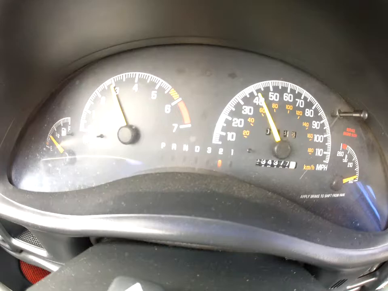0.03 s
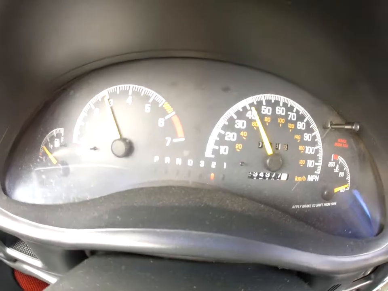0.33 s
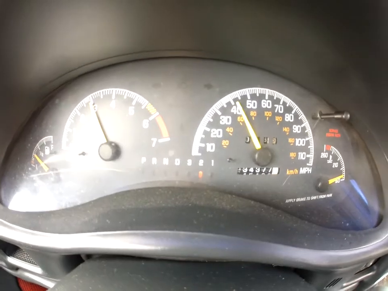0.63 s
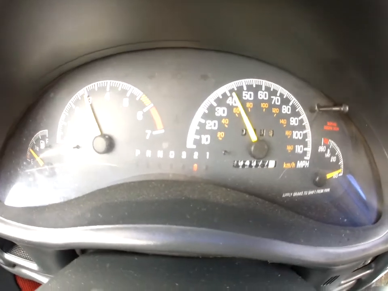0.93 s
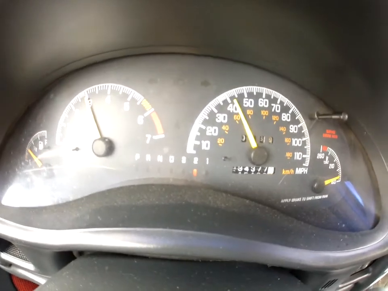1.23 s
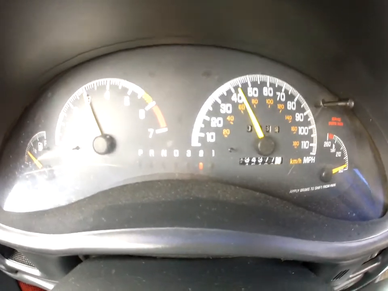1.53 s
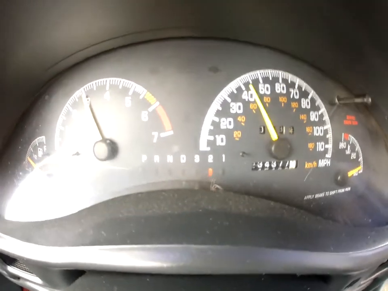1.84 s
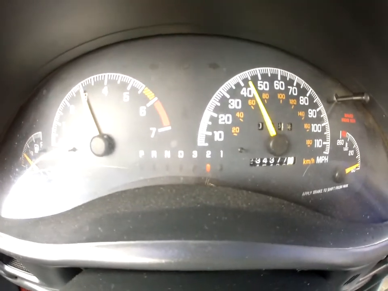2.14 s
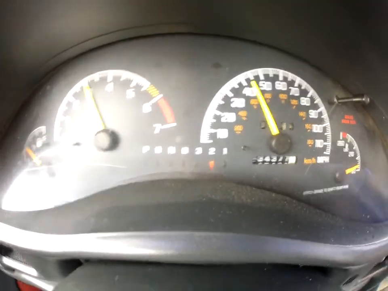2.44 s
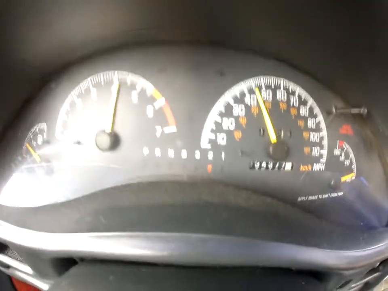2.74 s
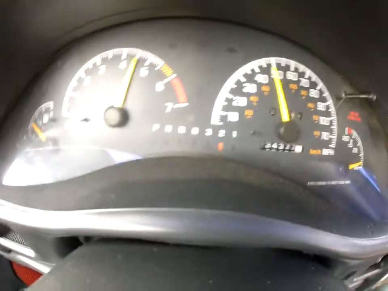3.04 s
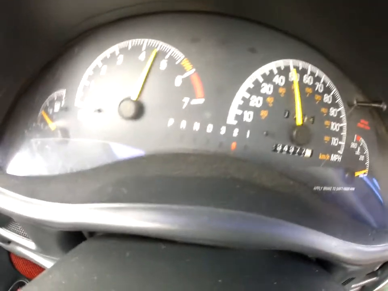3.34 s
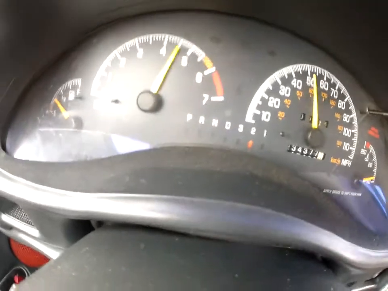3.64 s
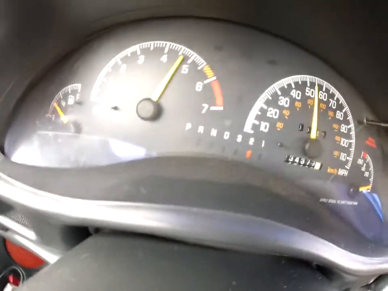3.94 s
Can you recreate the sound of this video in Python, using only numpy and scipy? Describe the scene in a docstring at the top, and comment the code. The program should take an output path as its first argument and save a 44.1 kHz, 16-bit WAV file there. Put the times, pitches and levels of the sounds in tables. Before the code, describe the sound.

A car engine hums low under steady road rumble, heard inside the cabin, with a soft bump around 1.1 seconds. At 2.5 seconds the accelerator clacks twice, air gulps in and the revs double by 2.8 seconds. The engine then holds a loud, throbbing roar with a faint supercharger whine and a thin microphone fizz, its pitch rising slightly just before the end at 4 seconds.

```python
"""Inside a cruising car, the road rumbles under the low hum of a V6 engine.
The accelerator is stamped down with two clacks, the gearbox drops to a lower gear and the revs double.
Air rushes in, a supercharger whines faintly, and the firing cylinders make the exhaust roar.
A small camera overloads slightly and holds each sample, which mirrors the sound into a thin, high fizz."""
import sys
import numpy as np
from scipy import signal
from scipy.fft import rfft, irfft, next_fast_len
from scipy.io import wavfile
from scipy.ndimage import map_coordinates

SR = 44100
rng = np.random.default_rng(int(sys.argv[2]) if len(sys.argv) > 2 else 0)


def log_audio(samples):
    """Write samples as a 16-bit WAV file to the path given in sys.argv[1]."""
    # one column per channel
    frames = np.atleast_2d(samples).T
    # limit to full scale, then quantise
    limited = np.clip(frames, -1, 1)
    pcm = np.round(limited * 32767).astype(np.int16)
    wavfile.write(sys.argv[1], SR, pcm)


N = 176400
CYLINDERS, LOBES_PER_CYCLE = 6, 11.39  # in one engine cycle, every cylinder fires once

# Levels are in decibels; engine load and throttle further scale the roar and the surge.
# tyre rumble and hiss (frequency [Hz], level [dB])
ROAD_SPECTRUM = [(10, -41), (25, -14), (50, -2.5), (75, -1), (95, 2), (115, -6.5), (165, -6.5),
                 (220, -11.5), (275, -7), (320, -16), (430, -18), (530, -22), (640, -21), (760, -35),
                 (1250, -35), (2500, -46.5), (3800, -56.5), (5400, -61.5), (5900, -73)]
# swells of low rumble: road bumps, and one as the engine booms (time [s], length [s], bass boost [dB])
RUMBLE_SWELLS = [(1.146, 0.13, 6.5), (2.766, 0.051, 4), (2.99, 0.3, 9.5), (3.602, .1, 8.5)]
# how fast the engine runs (time [s], speed [cycles/s])
ENGINE_SPEED = [(.1, 17.05), (1.2, 17.35), (2.47, 17.6), (2.59, 27), (2.64, 29.4), (2.695, 33.3), (2.8, 36),
                (3, 36.15), (3.1, 35.8), (3.22, 34.95), (3.36, 36.1), (3.45, 36.35), (3.78, 35.95),
                (3.93, 37.5), (4, 37.8)]
# how hard the engine works (time [s], level [dB])
ENGINE_LOAD = [(2.4, -38.5), (2.52, -10), (2.62, -7.5), (2.72, -1.5), (2.79, -0.5), (3.15, -1.5), (3.3, 0),
               (3.75, -1), (4, 0.5)]
# cruising hum (multiple of engine speed, level [dB])
HUM_TONES = [(4, -28.5), (8, -24.5), (15, -34.5), (24, -40), (28, -42.5), (36, -45)]
# cabin drone at twice the firing rate (time [s], level [dB])
DRONE_LEVEL = [(.1, -18), (.45, -23.5), (.9, -26), (1.3, -32), (2.4, -36.5), (2.6, -40)]
# pedal scuffs and clacks (time [s], level [dB], rise [s], time to fade 60 dB [s], clatter level [dB])
PEDAL_CLACKS = [(2.482, -40, 0.0033, 0.1, -9.5), (2.496, -24.5, 0.0067, 0.053, -7),
                (2.576, -32.5, 0.004, 0.064, 0.5)]
# the body of a clack (frequency [Hz], level [dB])
CLACK_COLOUR = [(300, -1.5), (1200, 7), (1800, 7), (2200, -0.5), (2600, 6), (3600, -8), (4400, 5.5),
                (5200, -2), (5900, 0)]
# its high clatter (frequency [Hz], level [dB])
CLATTER_COLOUR = [(2500, -8), (3700, -2.5), (4500, 1.5), (5500, -11.5)]
# pedal squeak and thuds (time [s], pitch [Hz], level [dB], time to fade 60 dB [s])
PEDAL_TONES = [(2.493, 5450, -32, 0.03), (2.509, 410, -6.5, 0.055), (2.509, 282, -10.5, 0.07),
               (2.582, 185, -12, .04)]
# supercharger tones (multiple of the rate at which its rotor lobes pass)
WHINE_TONES = [4, 6, 7, 8, 9]
# those tones swell in turn (time [s], then one level [dB] for each tone)
WHINE_LEVELS = [(2.63, -62, -62, -56, -50, -66), (2.705, -40, -56, -58, -38, -64),
                (2.79, -39, -58, -52, -49, -53), (2.88, -52, -55, -51, -50, -55),
                (3.05, -39, -53, -51, -48.5, -50), (3.22, -39, -56, -54, -52, -61),
                (3.35, -46.5, -47, -52, -52, -60), (3.52, -41.5, -57, -43, -50, -63),
                (3.72, -46.5, -48.5, -49.5, -49, -62), (3.87, -39, -46, -57, -50.5, -63),
                (4, -43, -39, -60, -55, -60)]
# air whistling at the throttle (time [s], length [s], level [dB])
THROTTLE_WHISTLES = [(2.636, .045, -35), (3.21, 0.15, -50)]
# gulp of air as the throttle opens (time [s], level [dB])
GULP_LEVEL = [(2.5, -59), (2.6, -28.5), (2.68, -25), (2.76, -24), (2.86, -55)]
# the gulp's tone colour (frequency [Hz], level [dB])
GULP_COLOUR = [(300, -30), (560, 7.5), (690, 4), (900, -9), (3000, -27.5), (5800, -51)]
# intake howl as the revs climb again (time [s], level [dB])
HOWL_LEVEL = [(3.7, -58.5), (3.88, -35), (4, -34)]
# the howl's tone colour (frequency [Hz], level [dB])
HOWL_COLOUR = [(500, -18.5), (700, 2.5), (1000, -11), (1320, 1), (1600, -34.5), (5000, -50)]
# air drawn into the engine (frequency [Hz], level [dB])
INTAKE_SPECTRUM = [(25, 2), (70, 8.5), (170, 0), (400, -2.5), (680, -7), (950, -21.5), (1550, -21),
                   (1900, -25), (3300, -29), (4500, -30.5), (5350, -33.5), (5750, -43.5)]
# rasp of the firing pulses (frequency [Hz], level [dB])
RASP_SPECTRUM = [(150, -27.5), (400, -2), (600, -1), (850, -11), (1100, -8), (1500, -14), (2000, -36.5),
                 (5000, -63.5)]
# boom of the firing tone (time [s], level [dB])
FIRING_LEVEL = [(2.48, -42), (2.58, -20), (2.68, -15.5), (2.76, -34.5), (2.85, -16), (3.1, -22),
                (3.24, -30.5), (3.45, -20.5), (4, -25)]
# exhaust roar (multiple of engine speed, level [dB])
EXHAUST_TONES = [(2, -27.5), (4, -21.5), (7, -36), (8, -23.5), (9, -23), (10, -21.5), (12, -22.5),
                 (13, -27), (14, -21.5), (18, -33), (19, -32.5), (20, -38), (22, -43.5), (23, -37),
                 (24, -39.5), (26, -45)]
# pitches the cabin boosts or weakens (frequency [Hz], gain [dB])
CABIN_RESONANCES = [(322, -0.5), (341, 5), (360, 0.5), (377, -6.5), (425, -7.5), (485, 0.5), (509, 1),
                    (530, -14), (570, -0.5)]


def amp(db):
    """Turn decibels into a gain."""
    return 10 ** (np.asarray(db) / 20)


def unit(x):
    """Scale to an average (rms) size of 1."""
    return x / np.sqrt(np.mean(x ** 2) + 1e-20)


def curve(rows):
    """Join (time, value) points with straight lines."""
    return np.interp(np.arange(N) / SR, *np.transpose(rows))


def swell(time, length):
    """A bell-shaped rise and fall around a moment."""
    return np.exp(-(2 * (np.arange(N) / SR - time) / length) ** 2)


def wobble(rate):
    """A smooth curve through `rate` random values a second."""
    return map_coordinates(rng.standard_normal(1200), [np.arange(N) * rate / SR + 2], mode="wrap")


def colour(x, spectrum):
    """Filter a sound to follow a spectrum, then scale it to size 1."""
    size = 2 * next_fast_len(N // 2 + 8192)
    hz, db = np.transpose(spectrum)
    log_hz = np.log(np.fft.rfftfreq(size, 1 / SR) + 1)
    cepstrum = irfft(np.log(amp(np.interp(log_hz, np.log(hz), db))))
    # make the filter ring after a pulse, never before it
    cepstrum[1:size // 2] *= 2
    cepstrum[size // 2 + 1:] = 0
    return unit(irfft(rfft(x, size) * np.exp(rfft(cepstrum)))[:N])


def noise(spectrum):
    """Noise with the given spectrum."""
    return colour(rng.standard_normal(N), spectrum)


def tones(cycles, rows, waver_db, drift, rate):
    """Tones at whole multiples of a cycle, each wavering in level and drifting in phase."""
    out = np.zeros(N)
    for multiple, db in rows:
        phase = 2 * np.pi * (multiple * cycles + rng.random()) + drift * wobble(rate)
        out += np.sqrt(2) * amp(db + waver_db * wobble(rate)) * np.sin(phase)
    return out


def road(bass_hz=150):
    """Tyres rumble and hiss; the bass swells over bumps and once as the engine booms."""
    rumble = amp(-20.5 + .5 * wobble(12)) * noise(ROAD_SPECTRUM)
    bass = signal.sosfiltfilt(signal.butter(2, bass_hz, fs=SR, output="sos"), rumble)
    heave_db = 0.88 * wobble(14) + sum(db * swell(time, length) for time, length, db in RUMBLE_SWELLS)
    return rumble + bass * (amp(heave_db) - 1)


def cruise(cycles, load):
    """The cabin drones, and a gentle hum gives way as the engine works harder."""
    hum = tones(cycles, HUM_TONES, waver_db=0.5, drift=0.5, rate=9) * np.clip(1 - 2 * load, 0, 1)
    drone = tones(cycles, [(2 * CYLINDERS, 0)], waver_db=1, drift=0.077, rate=20)
    return hum + amp(curve(DRONE_LEVEL)) * drone


def pedal():
    """The accelerator squeaks, clacks and thuds against its stop."""
    t, out = np.arange(N) / SR, np.zeros(N)
    for time, db, rise, fade, clatter_db in PEDAL_CLACKS:
        attack = np.clip((t - time) / rise, 0, 1)
        decay = amp(db - 60 * np.maximum(t - time - 2 * rise, 0) / fade)
        out += attack * decay * (noise(CLACK_COLOUR) + amp(clatter_db) * noise(CLATTER_COLOUR))
    for time, hz, db, fade in PEDAL_TONES:
        age = np.maximum(t - time, 0)
        attack = 1 - np.exp(-age / 0.0011)
        out += attack * amp(db - 60 * age / fade) * np.sin(2 * np.pi * hz * age)
    return out


def supercharger(cycles):
    """The air pump's spinning lobes whine in step with the engine."""
    times, *levels = np.transpose(WHINE_LEVELS)
    whine = np.zeros(N)
    for multiple, db in zip(WHINE_TONES, levels):
        tone = tones(LOBES_PER_CYCLE * cycles, [(multiple, 0)], waver_db=2, drift=0.28, rate=22)
        whine += amp(curve(np.c_[times, db])) * tone
    return whine


def whistle(hz=1980):
    """Air whistles briefly past the throttle."""
    tone = tones(hz * np.arange(N) / SR, [(1, 0)], waver_db=3.5, drift=0.5, rate=110)
    return tone * sum(amp(db) * swell(time, length) for time, length, db in THROTTLE_WHISTLES)


def gulp_and_howl():
    """Air gulps through the opening throttle and later howls in the intake."""
    return amp(curve(GULP_LEVEL)) * noise(GULP_COLOUR) + amp(curve(HOWL_LEVEL)) * noise(HOWL_COLOUR)


def intake(cycles):
    """Air rushes in, pulsing with each row of cylinders and each turn of the crankshaft."""
    row_pulse = 0.083 * np.sin(np.pi * CYLINDERS * cycles)
    crank_pulse = 0.044 * np.sin(2 * np.pi * 2 * cycles)
    level = amp(-19 + .6 * wobble(7))
    return level * colour((1 + row_pulse + crank_pulse) * rng.standard_normal(N), INTAKE_SPECTRUM)


def rasp(cycles, uneven=0.5, scatter=0.086):
    """One pulse per firing; each cylinder has its own strength and slightly different timing."""
    strength = 1 + uneven * unit(rng.standard_normal(CYLINDERS))
    lag = 0.074 * rng.standard_normal(CYLINDERS)
    firings = np.arange(1, int(cycles[-1] * CYLINDERS) - 1)
    cylinder = firings % CYLINDERS
    samples = np.interp((firings + lag[cylinder]) / CYLINDERS, cycles, np.arange(N))
    sizes = strength[cylinder] * (1 + scatter * rng.standard_normal(len(firings)))
    return amp(-35) * colour(np.bincount(samples.astype(int), sizes, N), RASP_SPECTRUM)


def firing_tone(cycles):
    """The firings blend into one note that booms as it sweeps through the cabin's resonance."""
    return amp(curve(FIRING_LEVEL)) * tones(cycles, [(CYLINDERS, 0)], waver_db=0.5, drift=0.091, rate=10)


def exhaust(cycles, speed, throb_hz=10.1, throb_peak_s=2.755):
    """Exhaust tones swell and fade as they slide through the cabin's resonances, over a low boom."""
    hz, gain_db = np.transpose(CABIN_RESONANCES)
    growl = np.zeros(N)
    for multiple, db in EXHAUST_TONES:
        cabin_gain = amp(np.interp(multiple * speed, hz, gain_db))
        growl += cabin_gain * tones(cycles, [(multiple, db)], waver_db=1.1, drift=.1, rate=24)
    # one row of cylinders booms, throbbing about once per wheel turn
    boom = tones(cycles, [(CYLINDERS // 2, -12)], waver_db=1, drift=0.09, rate=20)
    throb_db = 1.7 * np.cos(2 * np.pi * throb_hz * (np.arange(N) / SR - throb_peak_s))
    return growl + amp(throb_db) * boom


def scene():
    """Engine speed sets the pitch of its tones; load brings in the roar and the whine."""
    speed = curve(ENGINE_SPEED) * (1 + 0.00087 * wobble(24.99))
    cycles = np.cumsum(speed) / SR
    load = amp(curve(ENGINE_LOAD))
    throttle = np.clip(4 * load - .1, 0, 1)
    surge = firing_tone(cycles) + gulp_and_howl()
    roar = exhaust(cycles, speed) + rasp(cycles) + intake(cycles) + supercharger(cycles) + whistle()
    return (road() + cruise(cycles, load) + load * roar + throttle * surge + pedal())[None]


def record(dry, start_s=.106, hold_hz=12000, top_hz=15350):
    """Switch the sound on and off, round its peaks, add fizz and cut the highest treble."""
    t = np.arange(N) / SR
    gated = dry[0] * (t > start_s) * np.clip((t[-1] - t) / .003, 0, 1)
    rounded = gated / (1 + np.abs(gated) ** 16) ** (1 / 16)
    padded = np.pad(rounded, (0, SR))
    size = len(padded)
    slow = signal.resample(padded, size * hold_hz // SR)
    fizzy = signal.resample(np.repeat(slow, 4), size)  # holding each sample makes tiny steps that fizz
    return irfft(rfft(fizzy) * (np.fft.rfftfreq(size, 1 / SR) < top_hz))[None, :N]


dry = scene()
out = record(dry)
log_audio(out)
```